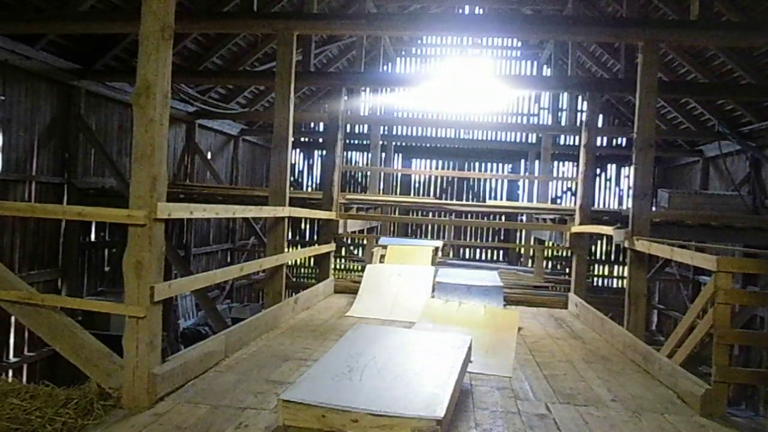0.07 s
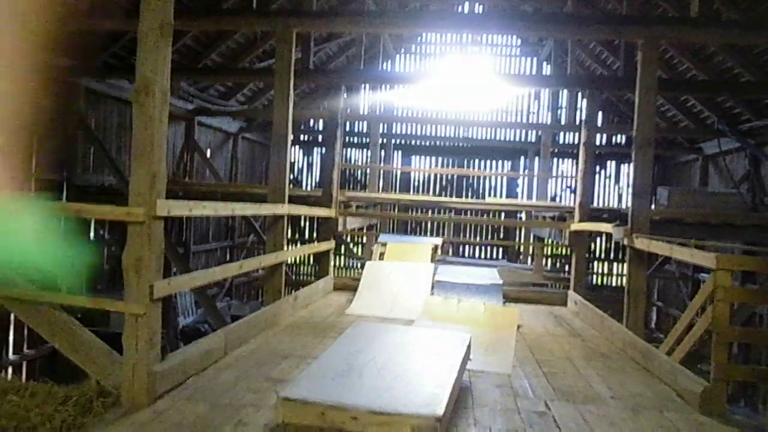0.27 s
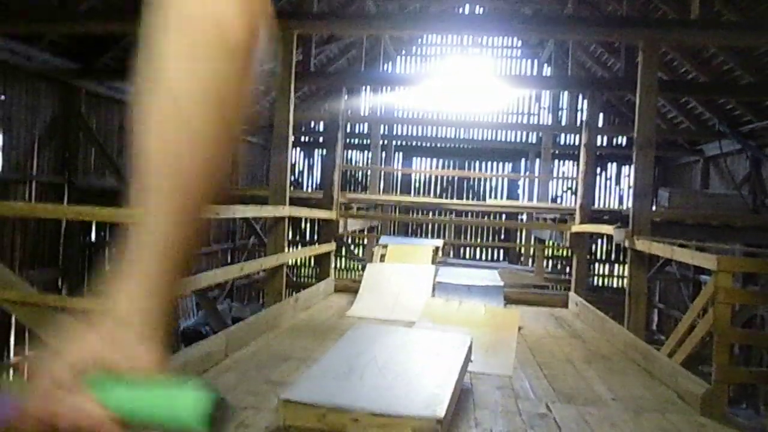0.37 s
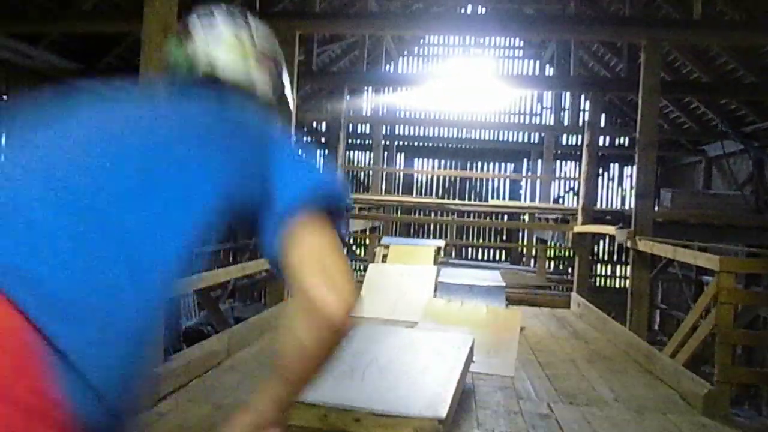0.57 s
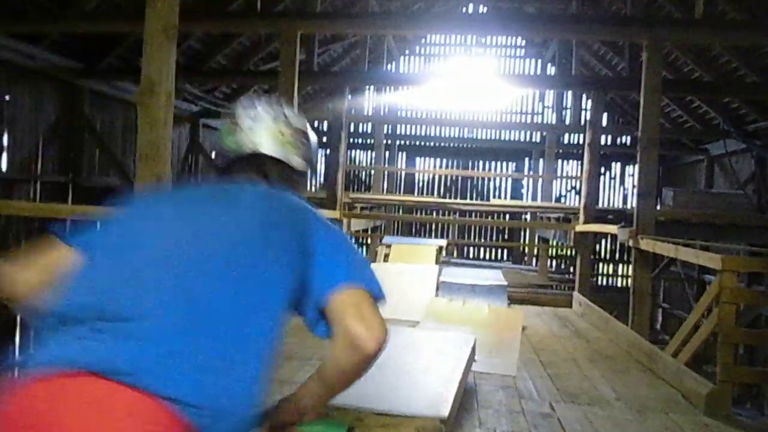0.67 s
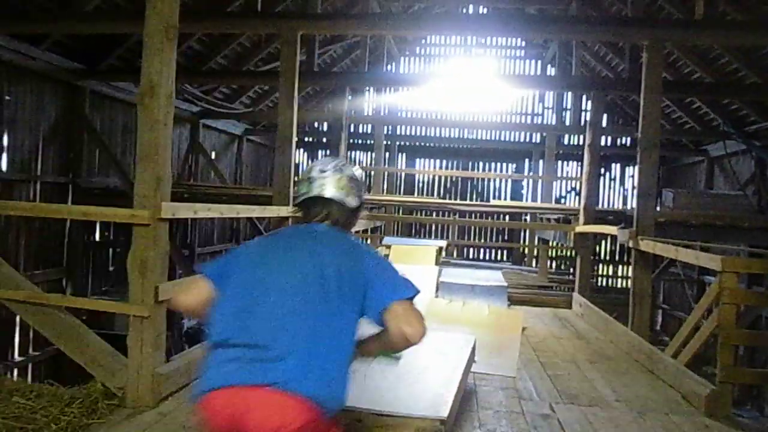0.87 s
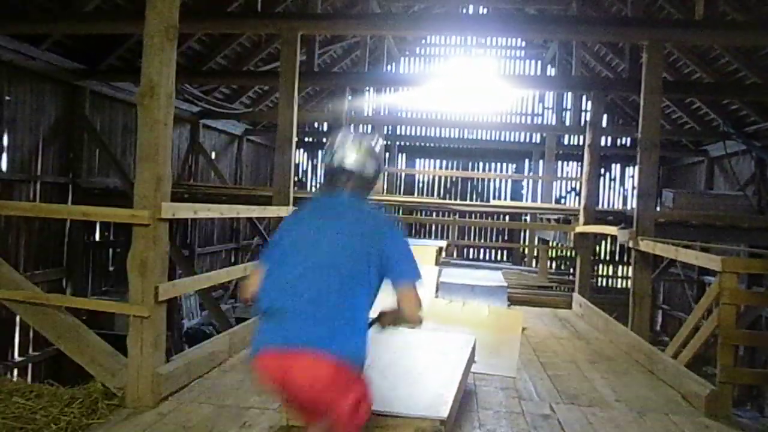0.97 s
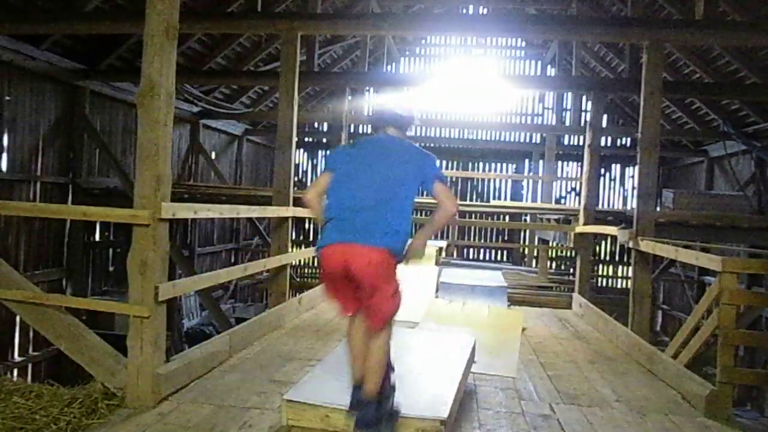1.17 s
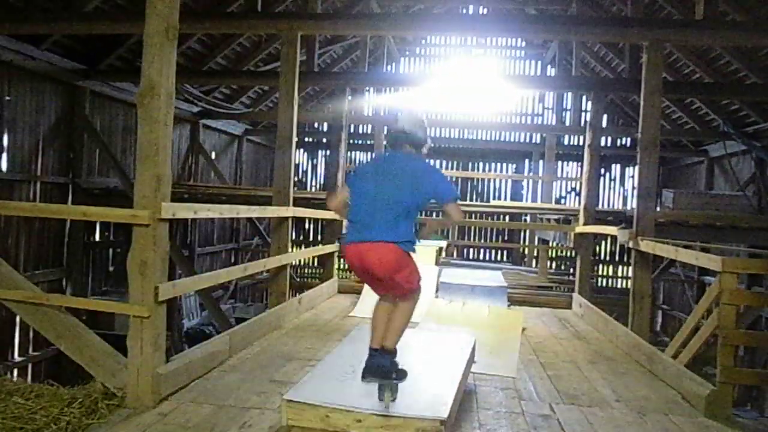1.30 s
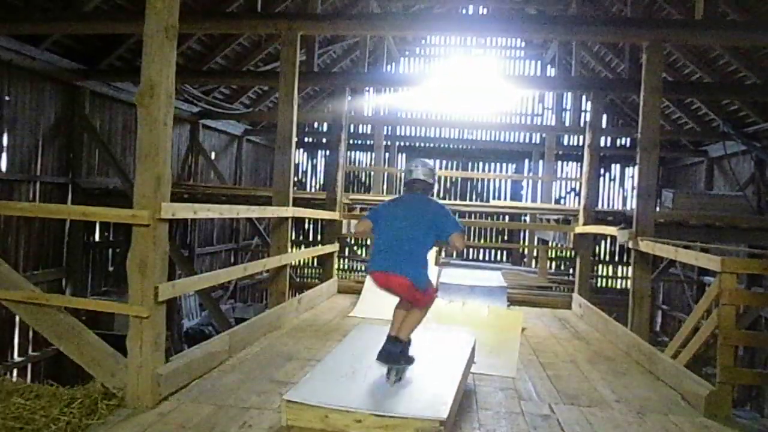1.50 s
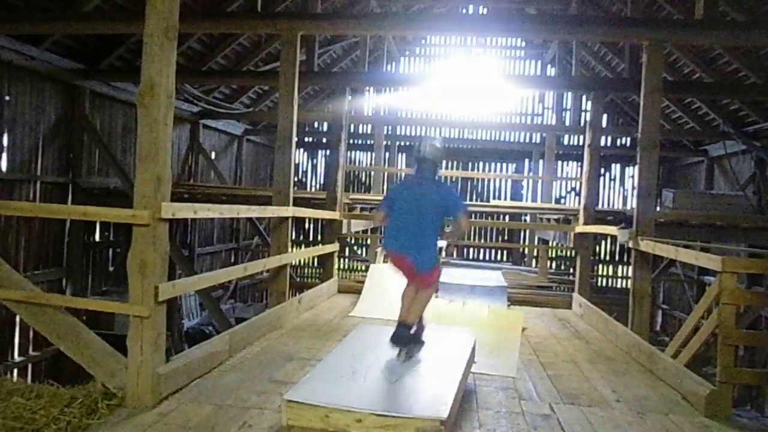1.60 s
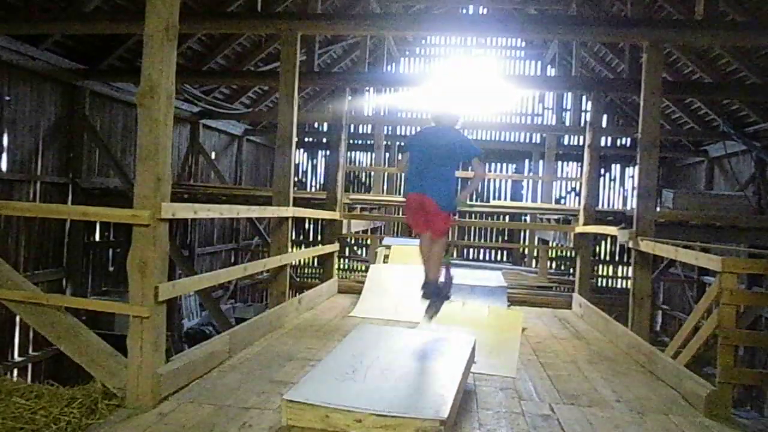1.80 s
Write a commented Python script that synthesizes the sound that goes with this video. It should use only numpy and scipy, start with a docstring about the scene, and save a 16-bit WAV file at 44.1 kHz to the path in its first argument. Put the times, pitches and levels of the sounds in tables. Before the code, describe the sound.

A kick scooter rolls over wooden planks, hops and slams onto a hollow ramp.

```python
"""A kick scooter rolls past close by over the plank floor of a barn: its wheels drone, crunch over
grit and thump on the seams, loose planks sound hollow notes and its metal parts chink.
The rider hops, the bearings whirr freely in the air, and the wheels slam down on a hollow wooden
ramp, roll over it and take off again. The barn rings on; the loudest blows overload the microphone."""
import sys
import numpy as np
from scipy import signal
from scipy.fft import rfft, irfft, next_fast_len
from scipy.io import wavfile
from scipy.ndimage import map_coordinates

SR = 44100
rng = np.random.default_rng(int(sys.argv[2]) if len(sys.argv) > 2 else 0)


def wav_record(signal):
    """Record a signal, one row per channel, as 16-bit PCM in the file named by sys.argv[1]."""
    frames = np.transpose(np.atleast_2d(signal))
    bounded = np.clip(frames, -1, 1)
    # unit amplitude maps onto the largest positive 16-bit level
    quanta = np.round(bounded * 32767).astype(np.int16)
    wavfile.write(sys.argv[1], SR, quanta)


N = 81585
BLOW_SAMPLES = 32768
# bright click of a hard contact (frequency [Hz], level [dB])
CLICK_SPECTRUM = [(800, -3), (3000, 0.5), (5300, 5.5), (7000, 1), (8500, 0), (12000, -5), (17000, -18)]


def amp(db):
    """Decibels as a gain."""
    return 10 ** (np.asarray(db) / 20)


def unit(x):
    """x at rms 1."""
    return x / np.sqrt(np.mean(x ** 2) + 1e-20)


def along(points, hz):
    """A breakpoint curve read at hz, on a log frequency axis."""
    freqs, values = np.transpose(points)
    return np.interp(np.log(hz + 1), np.log(freqs + 1), values)


def curves(rows):
    """One value per sample for each column after the time."""
    times, *columns = np.transpose(rows)
    return [np.interp(np.arange(N) / SR, times, column) for column in columns]


def at(s, x):
    """The short sound x, starting at s seconds."""
    return np.pad(x, (round(s * SR), N))[:N]


def decay(t, t60, attack_s):
    """Quick rise, exponential fall."""
    return np.exp(-np.log(1000) * t / t60) * (1 - np.exp(-t / attack_s))


def wobble(rate):
    """A smooth random curve with rate knots a second."""
    return map_coordinates(rng.standard_normal(2048), [np.arange(N) * rate / SR], mode="wrap")


def grains(per_s, spread_db):
    """Tiny random impacts of uneven size."""
    hits = rng.random(N) < per_s / SR
    return hits * rng.choice([-1, 1], N) * amp(spread_db * rng.standard_normal(N))


def filtered(x, response):
    """x through a frequency response."""
    size = next_fast_len(N + SR // 2)
    return irfft(rfft(x, size) * response(np.fft.rfftfreq(size, 1 / SR)), size)[:N]


def coloured(x, spectrum):
    """x shaped by a spectrum, at rms 1."""
    return unit(filtered(x, lambda hz: amp(along(spectrum, hz))))


def noise(spectrum):
    """Coloured noise of rms 1."""
    return coloured(rng.standard_normal(N), spectrum)


def resonate(x, modes):
    """x through parallel resonances of alternating polarity."""
    def response(f):
        return sum((-1) ** k * amp(db) * 1j * f * width / (hz * hz - f * f + 1j * f * width)
                   for k, (hz, width, db) in enumerate(modes))
    return filtered(x, response)


def rough_tone(hz, width_hz):
    """A noisy tone of rms 1 that follows the pitch hz."""
    phase = 2 * np.pi * np.cumsum(hz) / SR
    return unit(wobble(width_hz) * np.cos(phase) + wobble(width_hz) * np.sin(phase))


def ring(s, modes, scatter_db, attack_s):
    """Modes struck at s seconds, in a slightly different balance at every blow."""
    t = np.arange(BLOW_SAMPLES) / SR
    out = np.zeros(BLOW_SAMPLES)
    for hz, db, t60 in modes:
        gain = amp(db + scatter_db * rng.standard_normal())
        out += gain * np.sin(2 * np.pi * hz * t) * decay(t, t60, attack_s)
    return at(s, out)


def burst(s, spectrum, t60, attack_s):
    """A coloured noise burst struck at s seconds."""
    hz = np.fft.rfftfreq(BLOW_SAMPLES, 1 / SR)
    white = rng.standard_normal(BLOW_SAMPLES)
    shaped = unit(irfft(rfft(white) * amp(along(spectrum, hz))))
    return at(s, shaped * decay(np.arange(BLOW_SAMPLES) / SR, t60, attack_s))


def in_barn(x, wet_db, build_s):
    """x with the barn's reverb, which builds up and then lingers longest in the bass."""
    # reverb time (frequency [Hz], t60 [s])
    reverb_times = [(60, 1), (250, 0.44), (800, 0.66), (2500, 0.55), (5000, 0.55), (9000, 0.46),
                    (16000, 0.42)]
    hz, t, bands = signal.stft(rng.standard_normal(SR), SR, nperseg=256)
    envelopes = decay(t, along(reverb_times, hz)[:, None], build_s)
    _, tail = signal.istft(bands * envelopes, SR, nperseg=256)
    return x + amp(wet_db) * signal.fftconvolve(x, tail / np.linalg.norm(tail))[:N]


def room_tone():
    """A faint, steady bed of low air noise."""
    # air in the barn (frequency [Hz], level [dB])
    air_spectrum = [(25, -4.5), (100, -33), (180, -20), (245, -8.5), (320, -25), (1100, -29.5), (3000, -43),
                    (8000, -46), (17000, -51)]
    return amp(-48.5) * noise(air_spectrum)


def squeaks():
    """A wheel briefly sticks and slips with a very high whistle."""
    # thin squeaks (time [s], length [s], pitch [Hz], level [dB])
    slips = [(.395, .035, 14100, -38), (.43, 0.017, 11200, -33), (1.257, .06, 13600, -50)]
    out = np.zeros(N)
    for s, length, hz, db in slips:
        swell = at(s, np.hanning(round(length * SR)))
        out += amp(db) * swell * rough_tone(np.full(N, hz), width_hz=380)
    return in_barn(out, wet_db=-14, build_s=0.005)


def planks():
    """Each loose plank swells into a short hollow note with one overtone."""
    # wheels crossing loose planks (time [s], pitch [Hz], level [dB])
    notes = [(.806, 302.5, -14.5), (.812, 193.6, -16), (.832, 495, -18.5), (.85, 340, -14.5),
             (.89, 381.3, -15.5), (.912, 386, -16.5), (.975, 374, -19), (.99, 167.2, -15.5),
             (1.006, 448.4, -26), (1.05, 282, -20.5), (1.084, 169, -22)]
    t60, overtone_ratio, overtone_db = 0.18, 1.6, -5.5
    out = np.zeros(N)
    for s, hz, db in notes:
        modes = [(hz, db, t60), (hz * overtone_ratio, db + overtone_db, t60 / 2)]
        out += ring(s, modes, scatter_db=3.5, attack_s=0.011)
    return out


def chinks():
    """The scooter's loose metal clicks, rings high and briefly scrapes."""
    # parts knocking together (time [s], click level [dB], relative ring level [dB])
    hits = [(0.228, -23.5, -19.5), (0.3426, -19.5, -26), (.351, -19.5, -19), (0.432, -25, -38),
            (0.443, -23, -37), (0.453, -26, -42), (0.5, -22.5, -46), (0.55, -28.5, -50),
            (0.765, -24.5, -41), (.822, -31, -38), (0.926, -35.5, -58), (0.968, -38, -55)]
    # struck metal (frequency [Hz], level [dB], t60 [s])
    metal_modes = [(5400, -5, 0.04), (8215, 3, 0.05), (8400, 1, 0.07), (8800, -3, 0.05), (10500, -9, .04)]
    # metal rubbing on metal (time [s], level [dB])
    rub_levels = [(.34, -80), (.36, -36), (.39, -49), (.403, -35), (.425, -39.5), (.437, -27.5),
                  (.452, -59), (.48, -57), (.52, -85)]
    # rubbed metal (frequency [Hz], width [Hz], level [dB])
    rub_modes = [(8370, 120, 4.5), (10230, 170, 2), (11900, 380, -2), (13150, 210, -2), (14000, 190, -1),
                 (16800, 500, -7)]
    clicks = sum(amp(db) * burst(s, CLICK_SPECTRUM, t60=0.034, attack_s=0.00067) for s, db, _ in hits)
    jingle = sum(amp(db) * ring(s, metal_modes, scatter_db=0.5, attack_s=0.0012) for s, _, db in hits)
    rub_db, = curves(rub_levels)
    rub_gain = amp(rub_db + 1.7 * wobble(151.5))
    rub = rub_gain * unit(resonate(grains(per_s=4900, spread_db=-2.5), rub_modes))
    flicker = amp(2 * wobble(190))
    return in_barn(clicks + flicker * jingle / 2 + rub, wet_db=-9, build_s=0.004)


def bearings():
    """In the air the unloaded balls ring the wheel hubs, with a sinking rattle and short rasps."""
    # free-spinning wheels (time [s], hub level [dB], rattle level [dB])
    spin_levels = [(0, -94, -90), (.85, -78, -69), (.96, -34, -46), (1.05, -41, -39.5), (1.09, -27.5, -30),
                   (1.112, -29.5, -26), (1.14, -37, -36), (1.2, -34.5, -32.5), (1.27, -34, -57),
                   (1.36, -37, -43), (1.45, -53, -70), (1.72, -39.5, -70), (1.78, -34, -73),
                   (1.85, -36, -68)]
    # falling rattle (time [s], pitch [Hz])
    rattle_pitch = [(.95, 2665), (1.08, 2612), (1.112, 1950), (1.15, 1744), (1.2, 1553), (1.4, 1484)]
    # ringing hubs (frequency [Hz], width [Hz], level [dB])
    hub_modes = [(1457, 100, 6.5), (2056, 89, 1), (2580, 230, 0.5), (2960, 136, -1.5), (3210, 93, -4),
                 (5500, 10500, -26.5)]
    # bearings catching for a moment (time [s], level [dB])
    catches = [(.658, -22.5), (1.242, -33), (1.749, -27), (1.781, -24), (1.795, -24), (1.822, -21.5),
               (1.833, -28)]
    # rasp of a catch (frequency [Hz], level [dB])
    rasp_spectrum = [(700, -19), (1550, -1.5), (2200, 0.5), (2800, 5), (3300, -9), (4200, -21),
                     (12000, -40)]
    hub_db, rattle_db = curves(spin_levels)
    rattle_hz, = curves(rattle_pitch)
    hubs = unit(resonate(grains(per_s=2600, spread_db=0.5), hub_modes))
    whirr = amp(hub_db) * hubs + amp(rattle_db) * rough_tone(rattle_hz, width_hz=420)
    rasps = sum(amp(db) * burst(s, rasp_spectrum, t60=0.073, attack_s=0.00066) for s, db in catches)
    flutter = amp(1.96 * wobble(90))
    return in_barn(flutter * whirr + rasps, wet_db=-12, build_s=0.0072)


def rolling():
    """The planks shudder under the load while the wheels drone and crunch over grit."""
    # rolling contact (time [s], shudder level [dB], drone level [dB], grit level [dB])
    roll_levels = [(0, -35, -47, -65), (.1, -60, -57, -70), (.21, -54, -62, -73), (.235, -13.5, -23, -32.5),
                   (.32, -10, -25.5, -41), (.52, -13.5, -18, -33), (.61, -3, -21.5, -35.5),
                   (.68, -3.5, -21, -35), (.745, -5.5, -20.5, -30.5), (.8, -23, -18, -42.5),
                   (.92, -15, -17.5, -36.5), (1.01, -24, -21, -36.5), (1.1, -18.5, -31, -34),
                   (1.22, -29, -51, -44.5), (1.36, -35, -55, -41), (1.5, -24, -16, -45),
                   (1.57, -10.5, -21, -40.5), (1.65, -31, -30, -36), (1.76, -28.5, -42, -43.5),
                   (1.85, -31.5, -69, -48)]
    # deep floor shudder (frequency [Hz], level [dB])
    shudder_spectrum = [(10, -8), (24, -8.5), (36, -0.5), (55, -4.5), (80, -15), (130, -36), (300, -44),
                        (700, -84)]
    # wheel drone (frequency [Hz], level [dB])
    drone_spectrum = [(35, -29), (65, 11.5), (110, 2.5), (160, 2), (220, -1), (380, -8.5), (520, -14),
                      (850, -19.5), (1400, -78), (4000, -72)]
    # crunch of grit (frequency [Hz], level [dB])
    grit_spectrum = [(200, 17), (700, 8), (1500, 8), (3000, 3), (4500, -5), (8000, -13.5), (12000, -22),
                     (17000, -41)]
    shudder_db, drone_db, grit_db = curves(roll_levels)
    grit_gain = amp(grit_db + 4.2 * wobble(60))
    grit = grit_gain * coloured(grains(per_s=1400, spread_db=3.5), grit_spectrum)
    shudder = amp(shudder_db) * noise(shudder_spectrum)
    drone = amp(drone_db) * noise(drone_spectrum)
    return shudder + drone + in_barn(grit, wet_db=-2.5, build_s=0.0093)


def seams():
    """At each seam the floor booms, a plank thumps and knocks, and the hard wheel cracks."""
    # wheels striking seams (time [s], boom [dB], relative thump [dB], knock [dB], crack [dB])
    hits = [(0.219, 0.5, -3.5, -2.5, -7.5), (.291, -15.5, -17, -32, -44), (.378, -1, 0, -7.5, -10),
            (.582, -4, -9.5, -5, -8), (.611, -11, -22, -15.5, -26), (.658, -14, -13.5, -19, -22.5),
            (.676, -17, -2, -12, -20.5), (0.7115, -8.5, -5, -3.5, -7.5), (0.814, -14.5, -19, -13, -26),
            (0.996, -16, -20, -19.5, -33)]
    # the whole floor (frequency [Hz], level [dB], t60 [s])
    floor_modes = [(33.4, -6, 0.66), (56.2, -14, 0.29), (121.6, -11.5, 0.17), (142.2, -6.5, 0.282),
                   (262, -9.5, 0.095), (315, -10.5, 0.1)]
    # the struck plank (frequency [Hz], level [dB], t60 [s])
    plank_modes = [(87.2, 3.5, 0.18), (124.4, 2.5, 0.22), (151.4, -1.5, 0.16), (185, -6, 0.071)]
    # woody knock (frequency [Hz], level [dB])
    knock_spectrum = [(40, -2), (150, 5), (350, -1.5), (600, -6), (1000, -12), (1800, -21.5), (3500, -28),
                      (9000, -53)]
    # crack of the wheel (frequency [Hz], level [dB])
    crack_spectrum = [(200, -2.5), (1000, 8.5), (2800, 0), (5000, 0.5), (8000, -5), (13000, -15.5),
                      (17000, -31)]
    out = np.zeros(N)
    for s, boom_db, thump_db, knock_db, crack_db in hits:
        boom = amp(boom_db) * ring(s, floor_modes, scatter_db=2, attack_s=0.0012)
        thump = amp(thump_db) * ring(s, plank_modes, scatter_db=2, attack_s=0.0012) / 2
        knock = amp(knock_db) * burst(s, knock_spectrum, t60=0.099, attack_s=0.00015)
        crack = amp(crack_db) * burst(s, crack_spectrum, t60=0.031, attack_s=0.00049)
        out += boom + thump + in_barn(knock + crack, wet_db=-10, build_s=0.012)
    return out


def landing():
    """Wheels and deck slam down in quick succession; the hollow ramp booms and the barn answers."""
    # blows on the ramp (time [s], slam level [dB], slap level [dB], relative boom level [dB])
    blows = [(1.368, -1, -37, -10.5), (1.380, -0.5, -13.5, -4), (1.406, -6, -5.5, -2),
             (1.441, -10, -16, -16)]
    # heavy slam (frequency [Hz], level [dB])
    slam_spectrum = [(40, 7.5), (130, 9), (400, 1), (600, 3.5), (950, 3), (1600, -4.5), (3100, 1),
                     (4200, -12.5), (6500, -18.5), (10000, -25), (17000, -39)]
    # bright slap (frequency [Hz], level [dB])
    slap_spectrum = [(500, -33), (1500, 3.5), (2800, -3), (4400, 4.5), (6000, -8.5), (9000, -18.5),
                     (12000, -26), (17000, -30)]
    # hollow ramp (frequency [Hz], level [dB], t60 [s])
    ramp_modes = [(50, 3.5, 0.3), (135.4, 3, 0.38), (164.4, -4, 0.51), (249.7, -7.5, 0.37), (325, -5, 0.29),
                  (383.7, -3, 0.23), (494, -11.5, 0.41), (676, -14, 0.7), (821, -13.5, 0.58),
                  (846, -14, 0.61), (994, -15, 0.6), (1233, -19, .5)]
    touchdown_s = blows[0][0]
    impacts = amp(-4) * burst(touchdown_s, CLICK_SPECTRUM, t60=0.016, attack_s=0.000085)
    boom = np.zeros(N)
    for s, slam_db, slap_db, boom_db in blows:
        slam = amp(slam_db) * burst(s, slam_spectrum, t60=0.16, attack_s=0.0003)
        slap = amp(slap_db) * burst(s, slap_spectrum, t60=0.12, attack_s=0.00056)
        impacts += in_barn(slam + slap, wet_db=-7, build_s=0.015)
        boom += amp(boom_db) * ring(s, ramp_modes, scatter_db=4.5, attack_s=0.0023) / 2
    waver = amp(1.34 * wobble(40.23))
    return impacts + waver * boom


def scene():
    """The scooter's ride and hop over the barn's room tone, in mono."""
    scooter = seams() + planks() + chinks() + squeaks() + rolling() + bearings() + landing()
    return (scooter + room_tone())[None]


def record(dry):
    """The microphone overloads; a high-pass makes its flat tops sag, and the highest treble is cut."""
    hardness, highpass_hz, top_hz = 6, 11, 17969
    x = dry[0]
    clipped = x / (1 + np.abs(x) ** hardness) ** (1 / hardness)
    return filtered(clipped, lambda hz: 1j * hz / (highpass_hz + 1j * hz) * (hz < top_hz))[None]


dry = scene()
out = record(dry)
wav_record(out)
```